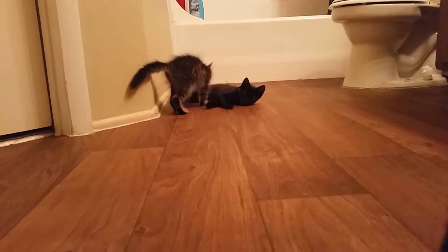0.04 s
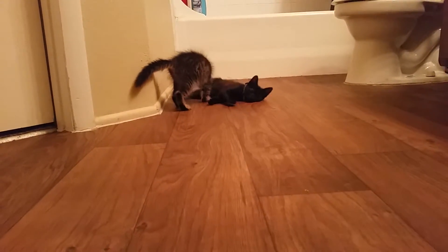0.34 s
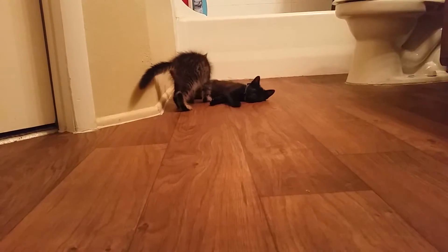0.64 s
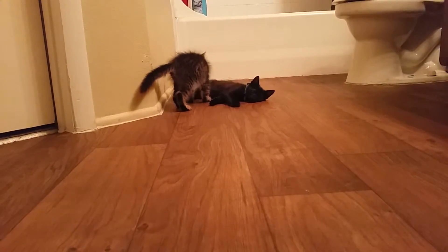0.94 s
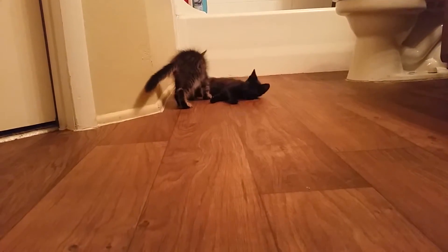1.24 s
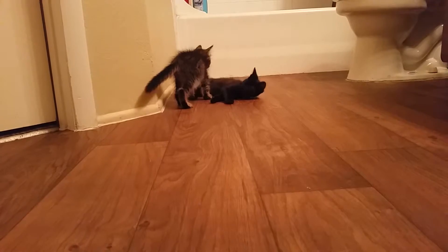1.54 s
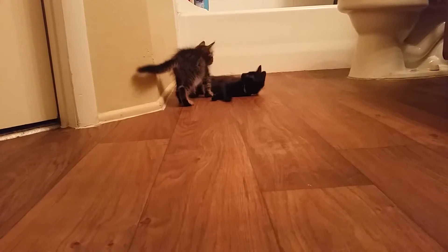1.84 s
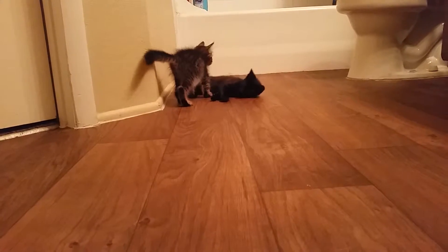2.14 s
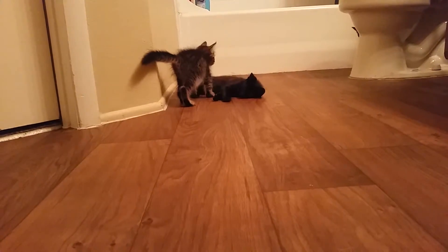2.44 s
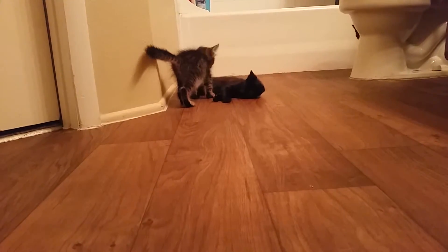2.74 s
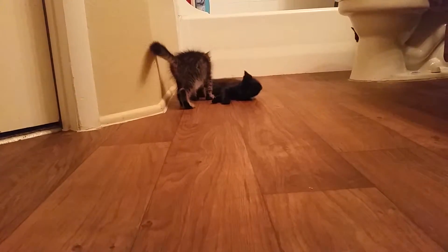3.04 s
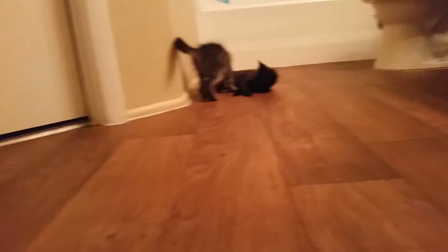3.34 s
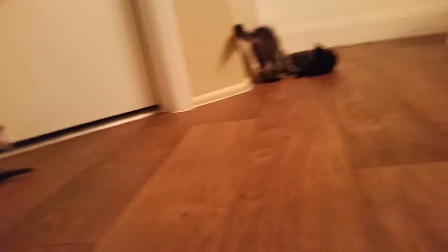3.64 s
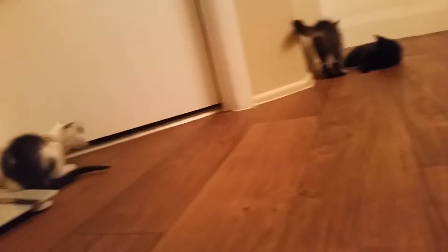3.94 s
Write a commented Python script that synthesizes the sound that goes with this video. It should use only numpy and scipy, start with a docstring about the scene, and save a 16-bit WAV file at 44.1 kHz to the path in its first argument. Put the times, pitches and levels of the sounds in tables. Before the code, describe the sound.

Small collar bells jingle in bursts as kittens play, with soft paw thumps on the floor.

```python
"""Small bells on the collars of kittens jingle in bursts as they play on a bathroom floor. A pellet inside each
bell hits the shell and rings a few short tones, which the hard room draws out. Paws thud on the floor over a
low rumble, a soft swish brushes past early on, and there is one thin, soft, high squeak. Near the end the
camera is moved: cloth rustles and a finger bumps over the right microphone."""
import sys
import numpy as np
from scipy import signal
from scipy.fft import rfft, irfft
from scipy.io import wavfile

SR = 44100
rng = np.random.default_rng(int(sys.argv[2]) if len(sys.argv) > 2 else 0)


def master(y):
    """Save y as 16-bit WAV."""
    cut = np.clip(np.atleast_2d(y).T, -1, 1)
    pcm = np.round(cut * 32767)  # scale
    wavfile.write(sys.argv[1], SR, pcm.astype(np.int16))


N = 176400

# how strong the room noise is at each pitch: f/Hz, level/dB
RUMBLE_COLOUR = [(12,-19),(22,-28),(32,-12),(42,0.5),(54,-6),(72,-2.5),(100,-8),(122,-0.5),(150,-13.5),(255,-16),(367,-27),(624,-31.5),(1000,-38),(1800,-48.5),(3200,-52.5),(4200,-49),(6500,-68.5),(9500,-67),(12500,-55.5),(16000,-54)]
# how alike that noise is in the two ears: f/Hz, likeness (0 to 1)
RUMBLE_LIKENESS = [(60,1),(130,0.84),(290,0.68),(640,0.11),(1400,0)]
# echoes from the near walls: delay/s, level/dB
WALL_ECHOES = [(.0128,-5),(.021,-8)]
# the main bell's four tones (low tone, shell clack, two high tones): f/Hz
BELL_HZ = [4710, 6250, 11211, 11805]
# the same tones; a wider one dies sooner: width/Hz, level/dB, left minus right/dB
BELL_TONES = [(50, -10.5, -12), (620, -10.5, -13), (24, -6.5, 1.5), (50, -9.5, 2.5)]
# the pellet rolling between strikes: t/s, level of the lower two tones/dB, level of the upper two/dB
ROLL_LEVELS = [(0,-68,-55),(.1,-76,-83),(.13,-58,-60),(.33,-67.5,-73),(.42,-58,-68),(.48,-49,-54),(.7,-58.5,-51.5),(.78,-70,-67),(.84,-58,-56),(.88,-45.5,-50),(.97,-55,-66),(1.15,-71,-78),(1.4,-81,-82),(1.9,-93,-100),
               (2.54,-86,-88),(2.6,-48,-50),(2.68,-58,-51),(2.70,-39,-48),(2.76,-36,-36),(2.85,-44,-55),(3.01,-48.5,-50.5),(3.1,-48.5,-45),(3.17,-46,-47),(3.23,-46,-52),(3.28,-43,-47),(3.35,-46.5,-50),(3.5,-50,-51),(3.7,-53.5,-50),(3.82,-43,-49),(3.845,-40.5,-41),(3.9,-39,-36),(3.96,-48,-60),(4,-42,-33)]
# how strongly rolling stirs each of the four tones: level/dB
ROLL_TONE_DB = [-2.5, -14.5, -10, -2]
# the dry tick of the pellet on the shell: f/Hz, level/dB
TICK_COLOUR = [(2500,-45),(3900,-30),(4300,-19),(4600,-3.5),(4950,6),(5300,-3.5),(6300,-5.5),(7000,-14),(9000,-17),(10700,-24),(11800,-12),(13000,-21),(16000,-34)]
# cloth and hand rubbing: t/s, level/dB
RUB_LEVELS = [(0,-73.5),(2.49,-90.5),(2.5,-63),(2.66,-61),(2.75,-56),(2.86,-61),(3.0,-62.5),(3.12,-58),(3.16,-46.5),(3.23,-61),(3.28,-48.5),(3.36,-44.5),(3.42,-54),(3.5,-49.5),(3.56,-47),(3.63,-49),(3.69,-56),(3.76,-48.5),(3.82,-49),(3.89,-43),(4,-61)]
# the hiss of that rubbing: f/Hz, level/dB
RUB_COLOUR = [(300,-9),(1500,-6),(2700,-15),(4200,-8),(6000,-3.5),(7300,2),(9000,-7.5),(12000,-3.5),(13500,-16.5),(16000,-4)]
# sharp snags in the rubbing: t/s, level/dB
SNAGS = [(0.39,-57),(2.4956,-44),(2.739,-44),(2.886,-44),(3.267,-37),(3.401,-32),(3.534,-29.5),(3.547,-40.5),(3.6716,-30.5),(3.720,-37),(3.753,-36.5),(3.966,-33.5)]
# strikes of the main bell: t/s, low tone/dB, shell clack/dB, first high tone/dB, second high tone/dB
STRIKES = [(0.105,-46.5,-63,-72,-50),(0.192,-51,-77,-80,-63),(0.271,-52.5,-81,-80,-78),(0.461,-47,-65,-60,-44.5),(0.521,-34,-54,-67,-71),(0.548,-55,-60,-66,-48),
           (0.604,-32,-46,-57,-36.5),(0.650,-53,-51,-50,-65),(0.681,-73,-51,-54,-53),(0.795,-48.5,-59,-49.5,-62),(0.849,-41,-49,-41,-49),(0.867,-32,-53,-43,-56),
           (1.097,-63,-65,-72,-64),(1.173,-53,-65,-78,-79),(1.306,-74,-68,-68,-76),(2.570,-43.5,-51,-55,-58),(2.587,-40,-52,-44,-52),(2.623,-52,-54,-49,-54),(2.660,-42,-49,-58,-58),
           (2.699,-46,-41,-44,-55),(2.722,-35,-41,-35,-53),(2.758,-29,-55,-32,-46),(2.788,-24,-29,-52,-37),(2.919,-43,-49,-49,-41),(3.026,-32,-34.5,-43,-52),
           (3.093,-32,-33,-58,-52),(3.146,-41.5,-58,-54,-54),(3.191,-28.5,-41,-62,-66),(3.241,-29,-37,-44,-45),(3.384,-38,-57,-56,-46),(3.489,-46,-58,-45,-49),
           (3.605,-62,-70,-49,-59),(3.760,-37.5,-41,-46,-37),(3.834,-26,-30,-52,-49),(3.850,-35,-37.5,-41,-35),(3.883,-31.5,-59,-34,-45),(3.900,-45,-43,-31,-46),(3.987,-30,-40,-42,-35)]
# soft shifts of the finger by the right microphone: t/s, level/dB, width/s
NUDGES = [(0.139,-23.5,.001),(0.343,-24.5,.001),(0.4378,-16,.001),(1.541,-14,.0009),(3.351,-15,.0028),(3.557,-16,.001),(3.699,-17,.002),(3.711,-18,.0005),(3.7545,-15,.0012)]
# tones of a second collar bell: f/Hz, width/Hz, level/dB, left minus right/dB
SECOND_BELL_TONES = [(4760,30,-1,-11),(11880,90,-16,2),(13020,70,-21,5)]
# its strikes: t/s, level/dB
SECOND_STRIKES = [(.192,-64),(.29,-63),(.411,-57),(.521,-48),(.604,-49),(.85,-48),(1.173,-66),(1.216,-68),(1.449,-76),(1.789,-78)]
# a soft swish brushing past: t/s, level/dB
BRUSH_LEVELS = [(.33,-86),(.385,-58),(.405,-52.5),(.45,-58.5),(.5,-64),(.72,-72.5),(.9,-89)]
# the hiss of that swish: f/Hz, level/dB
BRUSH_COLOUR = [(500,-22),(1350,-4.5),(1850,3.5),(2400,-8),(3100,1),(3800,-9),(5000,-1),(8000,-18.5),(16000,-11)]
# tones of three more bells (0, 1, 3) and a squeak (2): f/Hz, width/Hz, level/dB, left minus right/dB
BELL_AND_SQUEAK_TONES = [
    [(5350, 70, -1.5, -11), (12930, 64, -8.5, 6.5)],
    [(5870, 74, -7, -8), (14050, 110, -13, 11)],
    [(9220, 300, -6.5, 5)],
    [(11930, 80, -3, 1), (14280, 90, -5, 4)],
]
# when they sound: t/s, level/dB, which one (from 0)
BELL_AND_SQUEAK_TIMES = [(0.447,-51,0),(0.85,-58,0),(1.017,-52.5,1),(1.06,-72,1),(1.175,-62,1),(1.919,-64,0),(2.013,-67,3),(2.216,-69.5,0),(2.277,-55,0),(2.314,-54,0),(2.961,-55,2),(2.985,-52,2)]
# paws and knocks on the floor: t/s, thud level/dB, tap level/dB
STEPS = [(1.2217,-31,-26),(1.251,-31.5,-61),(1.384,-39,-58),(1.725,-29.5,-73),(2.327,-30,-69),(2.444,-33,-42),(3.11,-28,-70)]
# the sound of a tap on the floor: f/Hz, level/dB
TAP_COLOUR = [(100,-5),(400,8.5),(1000,-4),(1900,-11.5),(2600,-29.5),(4000,-25.5),(8000,-39),(16000,-52)]
# finger bumps on the right microphone: t/s, tug level/dB, push level/dB, tug width/s
BUMPS = [(3.3582,-24,-20,.0005),(3.3981,-22,-11,.0008),(3.4528,-19,-9.5,.0008),(3.4932,-13,-6,.0006),(3.5231,-14,-6.5,.0006),
         (3.565,-5,-3.5,.00045),(3.6045,-6,-2,.0007),(3.641,-6,-2,.0007),(3.7325,1,-3,.00033),(3.7644,-5,-4,.0006),(3.8048,-1,-2,.00045),(3.841,-18,-9,.0004),(3.967,-8,-1.5,.001)]

ROOM_ECHO_S, TREBLE_ECHO_S = 0.44, 0.38  # time for echoes to fade by 60 dB
TICK_PAN_DB, FINGER_LEFT_DB = -1, -26.5


def amp(db):
    """Turns decibels into a number to multiply by."""
    return 10 ** (np.asarray(db) / 20)


def unit(x):
    """Scales a signal to an average strength (rms) of 1."""
    return x / np.sqrt(np.mean(x ** 2) + 1e-20)


def pan(db):
    """Left and right volumes, with the left louder by db."""
    return unit(amp([[db / 2], [-db / 2]]))


def level(points, column=1):
    """Joins points of time and dB into a volume for every sample."""
    points = np.array(points)
    return amp(np.interp(np.arange(N) / SR, points[:, 0], points[:, column]))


def by_pitch(points, size):
    """Spreads a table over all the frequencies in a sound of this size."""
    hz, value = np.transpose(points)
    return np.interp(np.log(np.fft.rfftfreq(size, 1 / SR) + 1), np.log(hz + 1), value)


def colour(x, points):
    """Makes some pitches stronger and others weaker; plain white noise keeps its power."""
    return irfft(rfft(x) * unit(amp(by_pitch(points, x.shape[-1]))), x.shape[-1])


def add(mix, s, sound):
    """Mixes a sound in, starting at s seconds."""
    part = mix[:, max(round(s * SR), 0):][:, :sound.shape[-1]]
    part += sound[..., :part.shape[1]]


def clicks(per_s, spread_db):
    """Clicks of uneven size at random times."""
    size = amp(spread_db * np.minimum(rng.exponential(1, N), 4)) * rng.choice([-1, 1], N)
    return size * (rng.random(N) < per_s / SR)


def burst(decay_s):
    """A short puff of noise for each microphone."""
    t = np.arange(SR // 20) / SR
    return rng.standard_normal((2, len(t))) * np.exp(-t / decay_s)


def echoes(fade_s):
    """A wash of echoes for each microphone, dropping 60 dB in fade_s."""
    t = np.arange(SR // 2) / SR
    return unit(rng.standard_normal((2, len(t))) * 1000 ** (-t / fade_s)) / np.sqrt(len(t))


def room(hz, echo_db=2.5):
    """A click heard directly, off the near walls and as echoes; new each time, as the kittens move."""
    out = amp(echo_db) * echoes(np.interp(hz, [5000, 12000], [ROOM_ECHO_S, TREBLE_ECHO_S]))
    for delay_s, db in WALL_ECHOES:
        out[[0, 1], round(delay_s * SR) + rng.integers(0, 20, 2)] += amp(db)
    out[:, 0] += 1  # the direct sound
    return out


def ring(hz, width, db, pan_db):
    """One short tone ringing in the room; db sets the level of its first 25 ms."""
    tone = signal.lfilter(*signal.iirpeak(hz, hz / width, fs=SR), room(hz))
    band_hz = [hz - width - 300, hz + 650]  # trims sound far from the tone
    tone = signal.lfilter(*signal.butter(2, band_hz, "band", fs=SR), tone)
    start_strength = np.sqrt(np.mean(tone[:, :SR // 40] ** 2, axis=1, keepdims=True))
    return amp(db) * pan(pan_db) * tone / start_strength


def rumble(db=-40.5):
    """Steady low room noise, alike in both ears in the bass, with faint hiss above."""
    left, unrelated = rfft(rng.standard_normal((2, N)))
    likeness = np.clip(by_pitch(RUMBLE_LIKENESS, N), -1, 1)
    right = likeness * left + np.sqrt(1 - likeness ** 2) * unrelated
    noise = irfft(np.array([left, right]), N)
    return amp(db) * unit(colour(noise, RUMBLE_COLOUR))


def rolling_pellet(chatter_db=-7.5):
    """Many light touches of the pellet chatter on the shell and keep the main bell shimmering."""
    touches = clicks(per_s=170, spread_db=3.5)[None]
    chatter = colour(signal.fftconvolve(touches, room(BELL_HZ[0]), axes=1)[:, :N], TICK_COLOUR)
    out = unit(chatter) * pan(TICK_PAN_DB) * amp(chatter_db) * level(ROLL_LEVELS)
    for k, (hz, (width, _, pan_db)) in enumerate(zip(BELL_HZ, BELL_TONES)):
        shimmer = unit(signal.fftconvolve(touches, ring(hz, width, 0, 0), axes=1)[:, :N])
        out += shimmer * pan(pan_db) * amp(ROLL_TONE_DB[k]) * level(ROLL_LEVELS, column=1 + k // 2)
    return out


def cloth_rustle(echo_db=2.5):
    """Cloth and hand rub in a stream of tiny clicks, with a few sharp snags that echo."""
    grains = unit(np.array([clicks(per_s=1500, spread_db=4) for _ in range(2)]))
    snags = np.zeros((2, N))
    for s, db in SNAGS:
        add(snags, s, amp(db) * burst(decay_s=0.0024))
    snags += amp(echo_db) * signal.fftconvolve(snags, echoes(TREBLE_ECHO_S), axes=1)[:, :N]
    return pan(db=-1.5) * colour(grains * level(RUB_LEVELS) + snags, RUB_COLOUR)


def main_bell(tick_db=-3.5):
    """The pellet hits the shell: a dry tick, and four tones in a different balance each time."""
    tones, ticks = np.zeros((2, N)), np.zeros((2, N))
    for s, *levels in STRIKES:
        clack_db = levels[1]
        add(ticks, s, amp(clack_db + tick_db) * burst(decay_s=0.007))
        for hz, tone, db in zip(BELL_HZ, BELL_TONES, levels):
            add(tones, s, amp(db) * ring(hz, *tone))
    return tones + pan(TICK_PAN_DB) * colour(ticks, TICK_COLOUR)


def finger_nudges():
    """The resting finger shifts softly: each shift is one dull swing of air pressure."""
    out, t = np.zeros((2, N)), np.arange(-SR // 100, SR // 100) / SR
    for s, db, width_s in NUDGES:
        add(out, s + t[0], amp(db) * t / width_s * np.exp(-.5 * (t / width_s) ** 2))
    return amp([[FINGER_LEFT_DB], [0]]) * out


def second_bell():
    """A bell close in pitch to the main one joins the first bursts, so the two waver together."""
    out = np.zeros((2, N))
    for s, db in SECOND_STRIKES:
        add(out, s, amp(db) * sum(ring(*tone) for tone in SECOND_BELL_TONES))
    return out


def soft_swish():
    """A soft swish brushes past."""
    return colour(rng.standard_normal((2, N)), BRUSH_COLOUR) * level(BRUSH_LEVELS)


def other_bells_and_squeak():
    """Three more small bells tinkle with two tones each, and there is one thin, soft, high squeak."""
    out = np.zeros((2, N))
    for s, db, which in BELL_AND_SQUEAK_TIMES:
        for tone in BELL_AND_SQUEAK_TONES[round(which)]:
            add(out, s, amp(db) * ring(*tone))
    return out


def paw_steps(floor_hz=122.5, fade_s=0.24):
    """Each step sets the floor booming; a hard one also taps."""
    thuds, taps, t = np.zeros((2, N)), np.zeros((2, N)), np.arange(SR // 4) / SR
    boom = np.sin(2 * np.pi * floor_hz * t) * 1000 ** (-t / fade_s)
    for s, thud_db, tap_db in STEPS:
        add(thuds, s, amp(thud_db) * boom)
        add(taps, s, amp(tap_db) * burst(decay_s=0.0016))
    return thuds + colour(taps, TAP_COLOUR)


def finger_bumps(push_delay_s=0.0025, push_s=0.0013, crack_db=-28, crack_top_hz=2600, low_cut_hz=56):
    """A slipping finger tugs at the air in the microphone hole with a dry crack, then pushes it back."""
    out, cracks = np.zeros((2, N)), np.zeros((2, N))
    t = np.arange(-SR // 100, SR // 100) / SR
    for s, tug_db, push_db, tug_s in BUMPS:
        tug = amp(tug_db) / np.cosh(t / tug_s)
        push = amp(push_db) * np.exp(-.5 * ((t - push_delay_s) / push_s) ** 2)
        add(out, s + t[0], push - tug)
        add(cracks, s, amp(push_db + crack_db) * burst(decay_s=0.002))
    out += signal.lfilter(*signal.butter(2, crack_top_hz, fs=SR), cracks)
    out = signal.lfilter(*signal.butter(2, low_cut_hz, "high", fs=SR), out)
    return amp([[FINGER_LEFT_DB], [0]]) * out


def scene():
    """All the sounds together."""
    high_sounds = main_bell() + second_bell() + other_bells_and_squeak() + rolling_pellet()
    finger = finger_bumps() + finger_nudges()
    return high_sounds + finger + paw_steps() + cloth_rustle() + soft_swish() + rumble()


def record(dry, low_cut_hz=8.3, high_cut_hz=15720):
    """Takes away the very deepest bass and the very highest treble."""
    hz = np.fft.rfftfreq(N, 1 / SR) + 1
    bass_trimmed = irfft(rfft(dry) / np.sqrt(1 + (low_cut_hz / hz) ** 10), N)
    treble_filter = signal.firwin(1023, high_cut_hz, window=("kaiser", 9), fs=SR)
    return signal.oaconvolve(bass_trimmed, treble_filter[None], "same", axes=1)


dry = scene()
out = record(dry)
master(out)
```